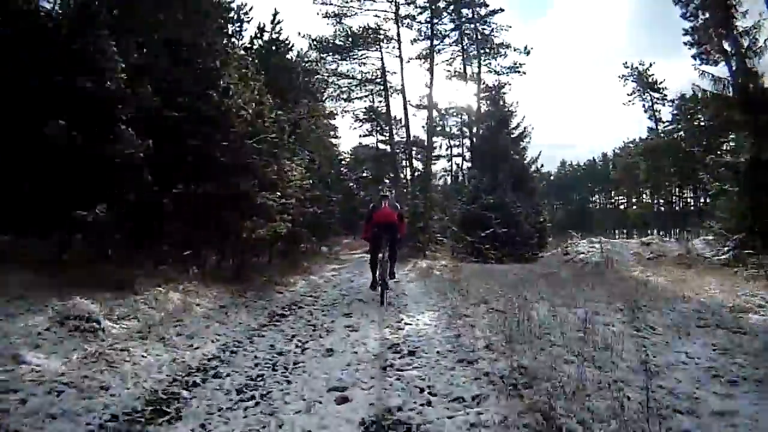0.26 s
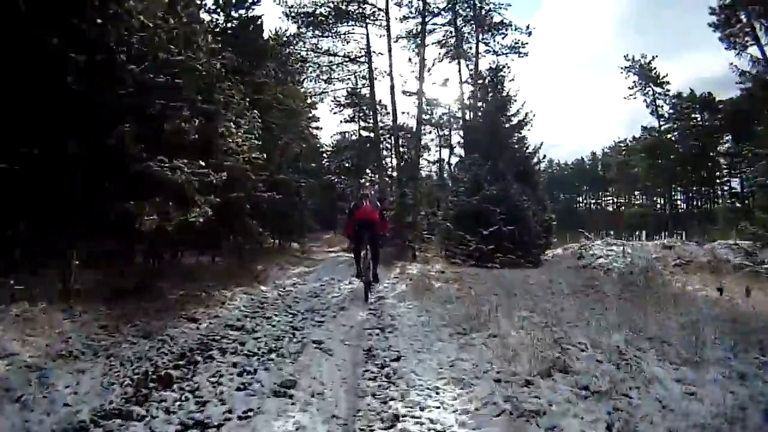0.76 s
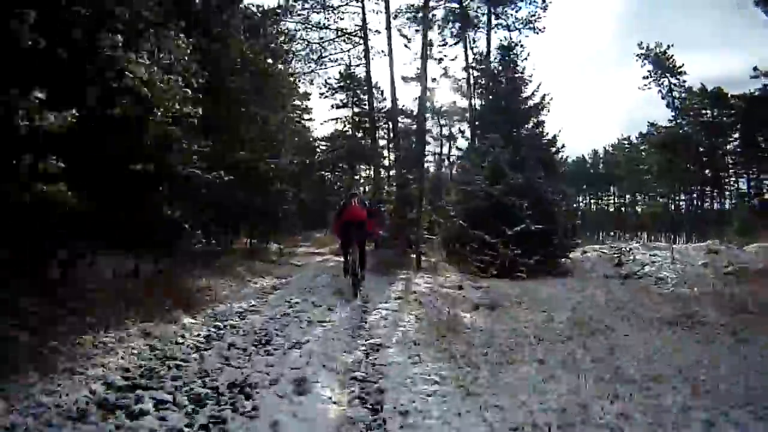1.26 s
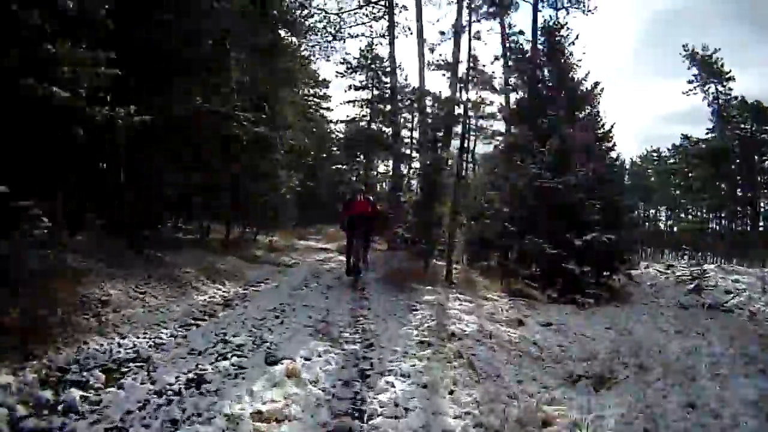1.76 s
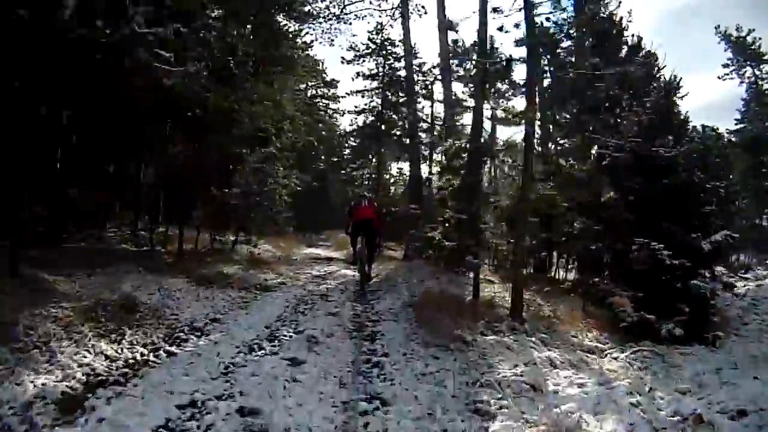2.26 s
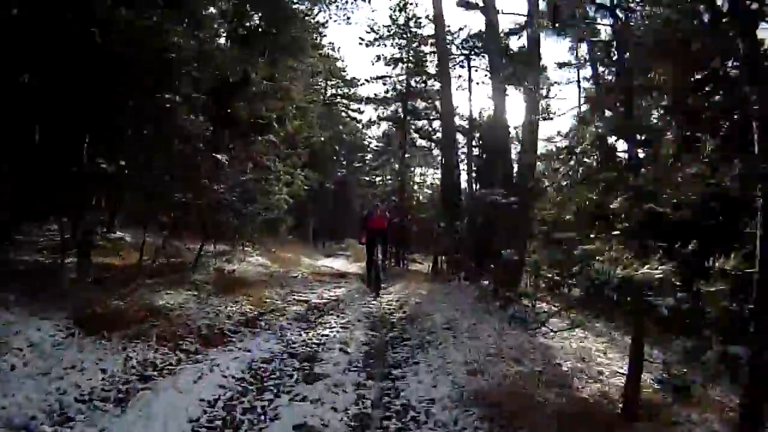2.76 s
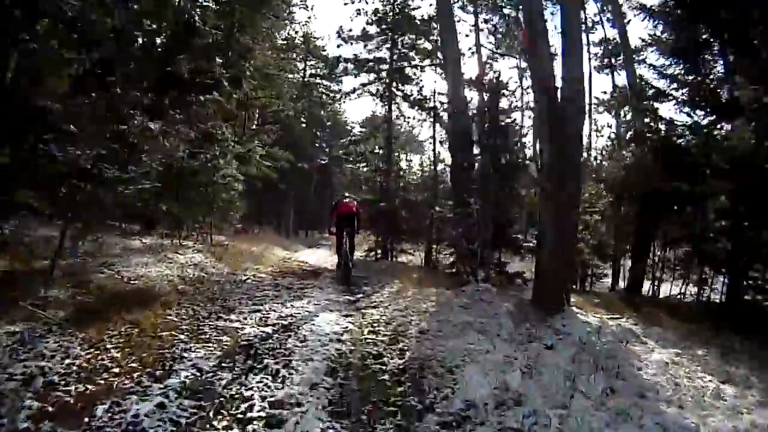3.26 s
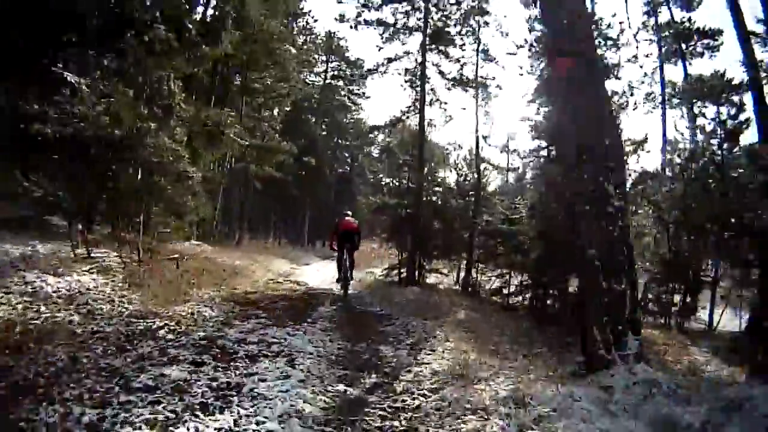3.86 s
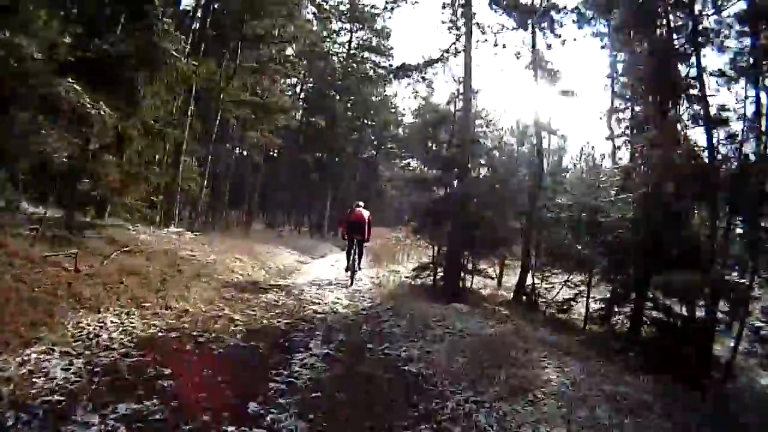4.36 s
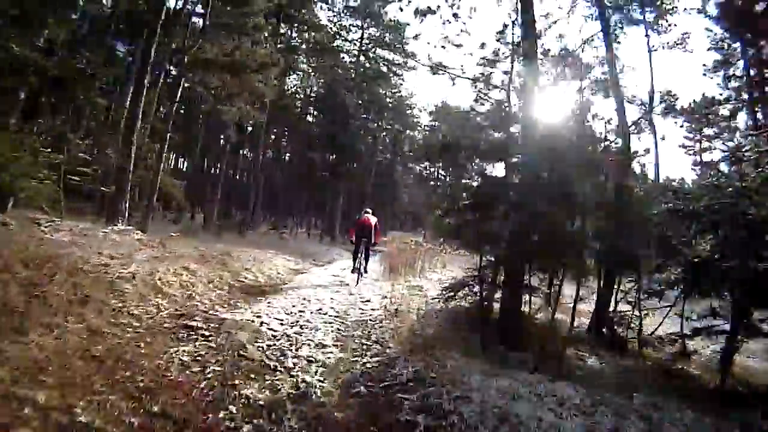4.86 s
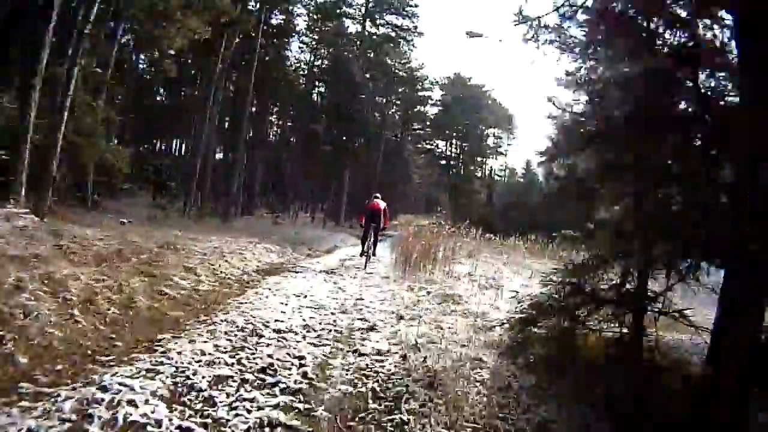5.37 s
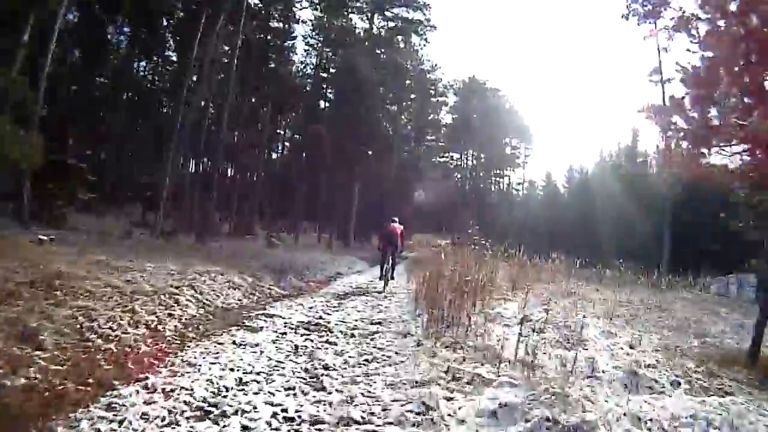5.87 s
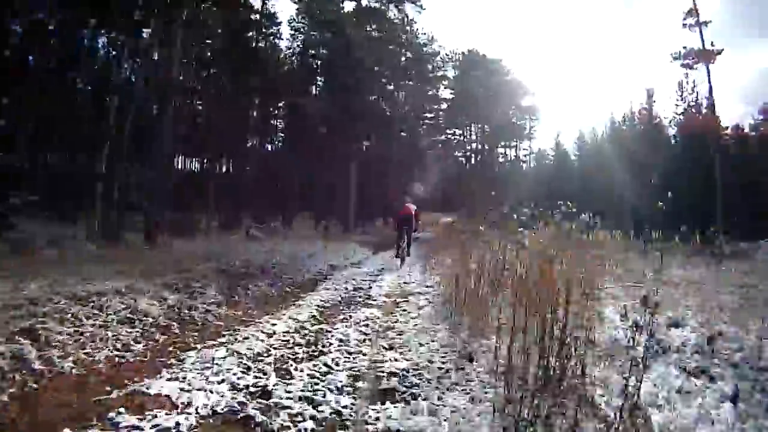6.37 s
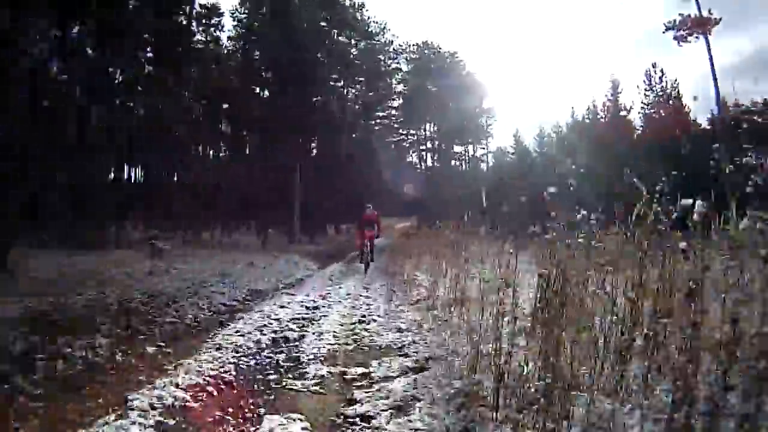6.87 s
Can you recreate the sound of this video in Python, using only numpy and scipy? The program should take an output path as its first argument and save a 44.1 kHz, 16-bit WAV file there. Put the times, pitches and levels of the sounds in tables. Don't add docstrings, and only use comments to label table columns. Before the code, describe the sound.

Bicycle tyres roll over hard ruts dusted with snow outdoors. Deep wobbling mount vibration and dull frame thuds sit beneath dry plastic clicks, flung ice chips, brief scrapes and very faint metallic rings. The ride starts fairly calm, takes a hard slap just before four seconds, and becomes rough and busy after four and a half. The microphone is inside the rattling housing; coarse, gritty treble and overloaded peaks.

```python
import sys
import numpy as np
from scipy import signal
from scipy.io import wavfile
from scipy.ndimage import uniform_filter1d

SR = 44100
rng = np.random.default_rng(int(sys.argv[2]) if len(sys.argv) > 2 else 0)


def to_wav(s):
    ch = np.atleast_2d(s).T
    pcm = np.round(np.clip(ch, -1, 1) * 32767)
    wavfile.write(sys.argv[1], SR, pcm.astype(np.int16))


def ratio_of_db(decibels):
    return 10 ** (np.asarray(decibels, float) / 20)


N = 313551

# (time [s], lumpiness level [dB], snow level [dB])
GROUND = [(0.0, -36, -51), (0.25, -41.5, -46.5), (0.55, -34.5, -48.5), (0.93, -39, -45), (1.4, -35, -44),
          (1.84, -34.5, -48), (2.2, -36, -46.5), (2.79, -37, -47.5), (3.2, -35, -45.5), (3.45, -34, -47.5),
          (4.2, -37.5, -50.5), (4.8, -29, -45.5), (5.15, -34.5, -53.5), (5.5, -33.5, -52.5),
          (5.85, -34.5, -51), (6.2, -29.5, -44.5), (6.6, -36.5, -48), (7.11, -30.5, -46.5)]
# (middle time [s], length [s], jolt gain [dB], crunch gain [dB])
PATCHES = [(0.92, 0.38, 5.5, -11.5), (1.54, 0.098, 8, 3), (1.7, 0.036, 3.5, 14), (2.345, 0.053, 9, 10),
           (3.044, 0.29, -1, 5), (3.564, 0.047, 11.5, 9), (3.645, 0.18, 17, 15), (3.785, 0.07, -4.5, 10.5),
           (3.964, 0.21, 12, -1), (4.085, 0.12, 3, 11), (4.426, 0.037, 9.5, -9), (4.512, 0.1, -7, 7.5),
           (4.642, 0.083, 14.5, 4), (1.36, .07, 2, -9), (1.303, 0.042, -5.5, -24), (3.41, 0.13, 0, 6),
           (0.972, 0.068, 3, 5), (1.15, 0.45, 1, -1), (4.787, 0.33, -5.5, 8), (4.858, 0.086, 2.5, -22),
           (4.957, 0.11, -10, 2), (5.047, 0.11, 11.5, 22), (5.124, 0.22, -0.5, 13.5),
           (5.246, 0.084, 8.5, 18.5), (5.349, 0.11, 4.5, 17), (5.496, 0.42, 1, 10),
           (5.633, 0.056, 15.5, 19.5), (5.736, 0.29, 0.5, 11.5), (5.911, 0.082, 9.5, 20),
           (5.975, 0.094, 12, 12), (6.097, 0.17, -2.5, 5), (6.29, 0.26, -1.5, 7), (6.728, 0.072, 12, -9),
           (6.912, 0.2, 5.5, 0)]
# (middle time [s], peak level [dB], length [s])
SWAYS = [(.04, -41, 0.44), (0.293, -35, 0.46), (0.51, -27.5, 0.14), (0.817, -34, 0.18), (1.156, -44, 0.68),
         (1.538, -35, 0.22), (1.88, -29.5, 0.49), (2.25, -26.5, 0.16), (2.57, -33.5, 0.95),
         (2.93, -27, 0.14), (3.163, -34, 1), (3.476, -33, 0.22), (3.683, -29, .2), (3.808, -34, 0.053),
         (4.057, -28, 0.46), (4.301, -26.5, 0.26), (4.436, -22, 0.093), (4.65, -27.5, 0.48),
         (4.927, -18.5, 0.21), (5.108, -23.5, 0.45), (5.39, -29, 0.51), (5.754, -21.5, 0.26),
         (6.073, -25.5, 0.29), (6.38, -26, 0.53), (6.628, -27.5, 0.14), (6.779, -20.5, 0.3),
         (7.036, -20, 0.23)]
# (frequency [Hz], width [Hz], level [dB])
FRAME_MODES = [(22.5, 10.9, 0.5), (99.2, 29.1, 0.5), (144.4, 32, -2.5), (212.5, 59, 2), (250, 64.7, 2),
               (340.7, 73.3, -5), (501.2, 47, -7), (815, 103, -25.5), (1220, 160, -42)]
# (frequency [Hz], level [dB per Hz])
GRIT_SPECTRUM = [(320, -31), (550, -23), (658, -37), (763, -1), (950, -3.5), (1710, -9.5), (2460, -2),
                 (3250, -23.5), (3740, -18), (4380, -48), (5900, -36), (7670, -65), (13000, -120)]
# (frequency [Hz], width [Hz], level [dB])
HOUSING_MODES = [(1573, 370, -17.5), (2197, 431, 1.5), (2370, 810, -2), (2988, 343, -4.5), (3536, 480, -12),
                 (3830, 370, -9), (4500, 580, -18), (5950, 10000, -27.5)]
# (frequency [Hz], width [Hz], level [dB])
PLATE_MODES = [(616, 620, 7), (950, 376, 10), (1357, 200, 2), (1900, 230, -1.5)]
# (frequency [Hz], level at a full tick [dB], decay by 60 dB [s])
METAL_RINGS = [(2900, -41, .16), (3800, -50, .1)]
# (time [s], peak level [dB])
TAPS = [(0.0258, -21.5), (1.145, -25), (1.566, -18.5), (1.83, -32), (1.869, -17), (1.97, -22.5),
        (2.3164, -29), (3.1728, -27), (3.47, -26), (3.7513, -19), (3.8007, -27.5), (3.839, -25),
        (4.3846, -19.5), (4.432, -23), (4.6676, -18), (4.7154, -20), (4.821, -25), (4.973, -25.5),
        (5.1188, -21), (5.221, -24), (5.58, -27.5), (5.6303, -28), (5.937, -30), (6.018, -24),
        (6.0567, -25.5), (6.1816, -23.5), (6.2632, -24), (6.313, -11.5), (6.9032, -29.5), (7.042, -22.5)]
# (time [s], peak level [dB])
CORNERS = [(0.028, -34), (0.5317, -28), (0.7755, -43), (1.5658, -27), (1.8687, -33), (1.946, -29),
           (2.0233, -29), (2.336, -20.5), (2.469, -31), (2.9572, -21), (3.238, -23), (3.6711, -17),
           (3.6965, -13), (3.8393, -36), (3.9434, -23), (3.983, -24), (4.3844, -48), (4.4508, -25),
           (4.7658, -27), (4.9006, -25), (5.0502, -16), (5.1193, -27), (5.1822, -19), (5.464, -24),
           (5.655, -18), (5.703, -21), (5.7445, -34), (5.9075, -33), (5.9584, -18), (6.2102, -24),
           (6.2971, -13.5), (6.351, -16), (6.5294, -33), (6.8427, -16.5)]
# (time [s], peak level
# [dB], loudest frequency [Hz])
CHIPS = [(1.182, -37.5, 2390), (1.691, -27, 1690), (1.693, -42, 2240), (1.847, -31, 2090),
         (1.9882, -29, 2390), (2.004, -29, 2300), (2.344, -35, 2840), (2.364, -26.5, 1760),
         (3.25, -29, 2770), (3.254, -26, 2900), (3.558, -34, 2120), (3.642, -12, 3030), (3.651, -19, 2340),
         (3.993, -28, 2880), (4.7366, -29, 2270), (4.756, -33, 2120), (5.012, -28, 1810),
         (5.0417, -21, 2670), (5.1994, -34, 2170), (5.2287, -32, 2590), (5.236, -21, 2470),
         (5.347, -36, 2270), (5.7033, -21.5, 2400), (5.726, -29, 2420), (5.7432, -21, 3920),
         (6.2218, -26, 2420), (6.252, -33, 2210), (6.3045, -38, 2410), (6.3375, -27, 2810),
         (6.363, -26, 2210), (6.51, -28, 2350), (6.716, -33, 2740), (6.8283, -33, 2050),
         (3.6978, 2.5, 3200), (3.631, -14, 2950), (3.6575, -24, 2920), (3.681, -26, 2880),
         (3.689, -20, 3580), (5.6767, -26, 2300), (5.626, -36, 3500), (5.696, -32, 2300), (3.7, -3, 1945),
         (.495, -47, 3000), (2.549, -42, 2600), (4.582, -46, 3700), (4.69, -33, 3800), (4.71, -32, 3730),
         (5.08, -30, 3800), (5.13, -36, 2780), (5.271, -34, 3970), (5.805, -29, 2370), (3.6981, -7, 1210),
         (4.646, -11, 1460), (4.6475, -12, 2130), (3.6946, -9, 3000), (3.655, -24, 1000),
         (4.631, -18.5, 2010), (5.581, -29.5, 2290), (5.875, -35, 4500), (5.931, -33, 4800),
         (5.49, -39, 4200)]
# (time [s], peak level [dB], loudest frequency [Hz], contact length [ms])
TICKS = [(0.5319, -19, 2670, 2.8), (0.776, -24.5, 3550, 4.5), (2.0234, -15.5, 2760, 3.3),
         (2.3358, -12, 2660, 2.1), (2.4711, -13.5, 2370, 2.7), (2.957, -17.5, 2500, 3.6),
         (3.2348, -3.5, 2550, 1.8), (3.239, -3.5, 2820, 1.9), (3.4902, -18.5, 2500, 2.2),
         (3.63, -30, 2960, 4.9), (3.7342, -16.5, 2190, 4.7), (3.983, -12.5, 2500, 3.3),
         (4.451, -13.5, 2500, 2.9), (4.7654, -10.5, 2280, 2.1), (4.8997, -16, 2690, 3),
         (5.0505, -7.5, 2760, 2.3), (5.07, -10.5, 2250, 1.1), (5.182, -12, 2310, 3.6),
         (5.2469, -9.5, 2280, 6.3), (5.464, -11, 2360, 2.1), (5.656, -8.5, 2380, 2.7),
         (5.7492, -10.5, 2430, 3.1), (5.908, -14.5, 2530, 3.6), (5.9582, -5, 2450, 2.6),
         (6.2095, -12, 2500, 3), (6.297, -8.5, 2240, 1.9), (6.352, -5.5, 2540, 1.5),
         (6.3706, -13.5, 2120, 3.3), (6.528, -12, 2360, 3.9), (6.842, -9.5, 2540, 3.3)]
# (time [s], peak level [dB])
RATTLES = [(1.514, -35), (2.758, -35), (3.5857, -27), (3.7793, -30), (3.816, -31), (3.908, -30),
           (4.0142, -26), (4.0694, -51), (4.4153, -29), (5.5233, -29), (5.669, -19), (5.712, -22),
           (5.768, -25), (5.7828, -24), (5.8202, -25.5), (5.8735, -37), (5.973, -24), (5.996, -24),
           (6.0346, -32), (6.2374, -24), (6.4094, -47), (6.504, -32), (6.5382, -19.5), (6.5874, -32.5),
           (6.6824, -29), (6.788, -34), (6.8568, -15), (6.9032, -35), (6.911, -26.5), (7, -42)]
# (time [s], peak level [dB], loudest frequency [Hz], contact length [ms])
SLAPS = [(1.7922, -23, 2640, 1.5), (1.944, -26, 2480, 7.9), (2.115, -29.5, 1820, 4),
         (2.6986, -33.5, 2300, 5.2), (2.902, -30.5, 2120, 3), (3.544, -35, 2090, 3.4),
         (3.5932, -25, 2200, 4.1), (3.622, -17.5, 2120, 4.5), (3.6706, -16.5, 2800, 2.2),
         (3.697, 3.5, 2030, 1.3), (3.9223, -30.5, 2320, 2.7), (3.942, -15.5, 2100, 5.2),
         (3.965, -33, 2220, 1.2), (4.5476, -24, 2250, 0.3), (4.629, -16, 1700, 3.7),
         (4.6451, -4.5, 1880, 1.4), (4.8405, -32.5, 2200, 3.9), (5.292, -26.5, 2150, 4.6),
         (5.35, -23.5, 2260, 1.5), (5.4197, -23.5, 1910, 0.76), (5.4242, -35, 3780, 8.3),
         (5.6166, -29, 3000, 10), (5.7027, -23, 4500, 1), (5.805, -35, 2100, 5.7)]
# (time [s], peak level [dB], loudest frequency [Hz])
BUMPS = [(0.266, -30, 231), (0.299, -17, 263), (0.594, -15.5, 216), (1.607, -20, 223), (1.752, -17, 223),
         (1.851, -17, 170), (2.917, -13, 238), (3.572, -16, 230), (3.601, -14, 272), (3.924, -11, 160),
         (4.58, -8.5, 149), (4.7, -9.5, 250), (4.852, -10, 230), (4.925, -15, 150), (5.067, -1.5, 197),
         (5.225, -8, 206), (5.606, -9, 151), (5.617, -23, 270), (5.655, -13.5, 420), (5.982, -3.5, 205),
         (6.202, -12, 201), (6.297, -11, 269), (6.351, -13, 287), (6.676, -12.5, 202), (6.688, -13, 205),
         (6.732, -9.5, 171), (6.978, -20, 179), (7.061, -25, 150), (3.687, -12, 110), (4.617, -6.5, 110)]
# (time [s], peak level [dB], loudest frequency [Hz], upper ring re thud [dB])
RUTS = [(0.897, -10, 300, -31), (1.049, -16, 271, -17.5), (2.424, -8, 248, -38), (2.568, -11.5, 217, -21),
        (3.236, -19, 386, -4), (3.557, -13, 260, -5.5), (3.632, -14, 267, -5), (3.694, -3.5, 412, -13),
        (3.904, -12, 222, -32), (4.548, -1, 292, -14.5), (4.631, -3, 198, -9), (4.6445, 0, 300, -7),
        (5.005, -6, 260, -36), (5.04, -8, 206, -14), (5.293, -11.5, 250, -5.5), (5.351, -2, 287, -10),
        (5.629, -2, 307, -12.5), (5.695, -10, 227, -18), (5.72, -5.5, 250, -14), (5.748, -10, 215, -12),
        (5.918, -8, 230, -23), (5.963, -5, 220, -26), (6.157, -10, 258, -32), (6.228, -9, 220, -10),
        (6.34, -10, 262, -11.5), (6.366, -6, 218, -12), (6.531, -12, 222, -13.5), (6.715, -5.5, 205, -33),
        (6.918, -4.5, 150, -17), (7.041, -3.5, 253, -13)]
# (start time [s], rms level [dB], length [ms])
GRINDS = [(.65, -55, 32), (3.598, -44, 20), (3.618, -35, 19), (3.64, -36, 26), (3.672, -35, 11),
          (4.61, -44, 20), (4.652, -39, 30), (4.98, -50, 44), (5.035, -45, 62), (5.183, -41.5, 25.5),
          (5.246, -39, 10), (5.615, -41, 37), (5.657, -40.5, 24), (5.96, -37, 31), (6.295, -39, 27),
          (6.35, -38, 44), (.86, -58, 92), (1.36, -61, 90), (5.33, -55, 40), (5.42, -49, 60),
          (5.69, -47, 65), (5.865, -47, 72), (6.18, -50, 100), (6.5, -52, 63), (6.83, -49, 45),
          (3.55, -51, 25)]
# (time [s], peak level [dB], frequency [Hz])
PINGS = [
    (0.78, -48, 2870),
    (1.147, -48, 2880),
    (1.567, -56, 2880),
    (2.474, -40.5, 2910),
    (3.702, -41, 3810),
    (3.703, -36, 2870),
    (4.652, -38, 2780),
]
# (start time [s], rms level [dB], length [ms])
SCUFFS = [(4.048, -48, 19), (4.215, -53, 21), (4.628, -38, 34), (5.038, -42, 12), (5.225, -56, 25),
          (5.335, -56, 18), (5.418, -35.5, 17), (5.455, -33.5, 4), (5.61, -40, 10), (5.699, -39.5, 25),
          (5.872, -40, 12), (5.937, -37, 6.1), (6.255, -33, 14), (6.385, -46, 27), (6.856, -55, 8.8)]
# (frequency [Hz], level re sound [dB], share of time [0-1])
CHANNEL_ERROR = [(60, -40, 0.083), (300, -40, 0.104), (1000, -18.5, 0.11), (3000, -31, 0.12),
                 (4500, -12, 0.3), (6600, -3.5, 0.98), (9900, -19.5, 0.4), (16000, -1, 0.22)]

MOUNT_HZ, MOUNT_WIDTH_HZ, MOUNT_REST_DB = 48.7, 11.9, -34
CRACKLE_DB, CRACKLE_FOLLOWS_LUMPS = -70.5, 0.77
GRIT_FOLLOWS_CRUNCH, GRIT_FOLLOWS_JOLT = 0.27, 0.69
HISS_DB = -69
# (level reaching the clamp plate [dB], lean to one resonance, metal part damped)
TICK, TAP, SLAP = (-23, 0.73, False), (-22, 0.37, False), (-8, 1.36, True)
RATTLE, CHIP, CORNER = (-35, 0.1, False), (-23, 2.8, True), (-40, 11, True)
TAP_HZ, TAP_MS = 2550, 3.4
RATTLE_HZ, RATTLE_MS = 3120, 2.6
CHIP_MS = 1.37
CORNER_HZ, CORNER_MS, CORNER_LOSS_DB = 3904, 0.93, 3.5
SNAP = 4.54
BUMP_UPPER_DB = -15
PING_T60_S = 0.17
TOP_OPENS_DB = 18
UP, DOWN, HOLD = 147, 40, 4


def rms_one(x):
    return x / np.sqrt(np.mean(x ** 2) + 1e-20)


def band_pass(x, order, low_hz, high_hz):
    return signal.sosfilt(signal.butter(order, [low_hz, high_hz], "band", fs=SR, output="sos"), x)


def in_time(rows):
    s, *columns = np.transpose(rows)
    return [np.interp(np.arange(N) / SR, s, c) for c in columns]


def swells(middle_s, length_s, height):
    t = np.arange(0, N, 40) / SR
    away = np.clip((t[:, None] - middle_s) / np.maximum(length_s, 0.02), -0.5, 0.5)
    humps = np.cos(np.pi * away) ** 2
    return np.interp(np.arange(N) / SR, t, humps @ height)


def drift(rate):
    r = np.exp(-80 * np.pi * rate / SR)
    noise = rng.standard_normal(N // 40 + 2002)
    slow = signal.lfilter([1], [1, -2 * r, r * r], noise)[2000:]
    return np.interp(np.arange(N) / 40, np.arange(len(slow)), rms_one(slow))


def resonance(x, hz, width_hz):
    r = np.exp(-np.pi * width_hz / SR)
    poles = [1, -2 * r * np.cos(2 * np.pi * hz / SR), r * r]
    return signal.lfilter([(1 - r * r) / 2, 0, (r * r - 1) / 2], poles, x)


def body(x, modes):
    return sum((-1) ** k * ratio_of_db(db) * resonance(x, hz, width) for k, (hz, width, db) in enumerate(modes))


def grains(per_s, spread_db):
    sizes = ratio_of_db(spread_db * np.minimum(rng.exponential(1, N), 4.2)) * rng.choice([-1, 1], N)
    return rms_one(sizes * (rng.random(N) < per_s / SR))


def add(out, s, sound, peak_db):
    i = max(round(s * SR), 0)
    out[i:i + len(sound)] += (ratio_of_db(peak_db) * sound / np.max(np.abs(sound)))[:N - i]


def bursts(events, soft_samples):
    t = np.arange(N) / SR
    gate = sum(ratio_of_db(db) * ((t > s) & (t < s + ms / 1000)) for s, db, ms in events)
    return uniform_filter1d(gate, size=soft_samples)


def mount(sway_db):
    shake = rng.standard_normal(N)
    narrow = resonance(shake, MOUNT_HZ, MOUNT_WIDTH_HZ)
    sway = rms_one(resonance(narrow, MOUNT_HZ, 102))
    evened = sway / (1.25 + np.sqrt(uniform_filter1d(sway ** 2, size=2500)))
    return ratio_of_db(sway_db) * rms_one(evened)


def frame(rumble_db):
    jolts = grains(per_s=400, spread_db=5.0) + 1.3 * rng.standard_normal(N)
    together = drift(rate=2.9)
    shaken = 0
    for k, (hz, width, db) in enumerate(FRAME_MODES):
        share_db = db + 1.4 * together + 1.36 * drift(rate=9.6)
        shaken = shaken + (-1) ** k * ratio_of_db(share_db) * resonance(jolts, hz, width)
    return ratio_of_db(rumble_db + 3.0) * rms_one(shaken)


def grit(grit_db):
    clumps = ratio_of_db(1.7 * drift(rate=30))
    crumbs = [clumps * (rng.standard_normal(N) + 0.75 * grains(per_s=840, spread_db=6.5))
              for _ in range(2)]
    edges = 550 * 2 ** (np.arange(12) / 3.2)
    hz, db = np.transpose(GRIT_SPECTRUM)
    out = 0
    for k, (low, high) in enumerate(zip(edges, edges[1:])):
        band = band_pass(crumbs[k % 2], 2, low, high)
        level_db = np.interp(np.log(low * high) / 2, np.log(hz), db)
        out = out + ratio_of_db(level_db + 2 * drift(rate=50.0)) * band
    out = out + 0.73 * resonance(out, 1370, 180)
    return ratio_of_db(grit_db - 1.6) * rms_one(out)


def crackle(crackle_db, crunch_db):
    runs = ratio_of_db(4.0 * drift(rate=83))
    thick = np.clip(0.3 + crunch_db / 10, 0.1, 2.2)
    clicks = grains(per_s=2400, spread_db=6.5) + 0.4 * rng.standard_normal(N)
    crumbs = thick * runs * clicks + 0.4 * rng.standard_normal(N)
    bright = band_pass(crumbs, 2, 2800, 5700)
    return ratio_of_db(crackle_db + 0.5) * rms_one(bright + 2.2 * body(crumbs, HOUSING_MODES))


def hiss():
    faint = band_pass(rng.standard_normal(N), 1, 1500, 8000)
    return ratio_of_db(HISS_DB + 2.1 * drift(rate=1.6)) * rms_one(faint)


def contacts():
    hard = [(*row, *TICK) for row in TICKS]
    slaps = [(*row, *SLAP) for row in SLAPS]
    taps = [(s, db, TAP_HZ, TAP_MS, *TAP) for s, db in TAPS]
    rattles = [(s, db, RATTLE_HZ, RATTLE_MS, *RATTLE) for s, db in RATTLES]
    chips = [(s, db, hz, CHIP_MS, *CHIP) for s, db, hz in CHIPS]
    corners = [(s, db - CORNER_LOSS_DB, CORNER_HZ, CORNER_MS, *CORNER) for s, db in CORNERS]
    return hard + slaps + taps + rattles + chips + corners


def ticks():
    out, t = np.zeros(N), np.arange(6000) / SR
    events = contacts()
    chance = rng.standard_normal((len(events), 1000))
    for (s, peak_db, hz, ms, plate_db, lean, damped), noise in zip(events, chance):
        contact = np.zeros(len(t))
        fade = t[:1000] / (max(ms, 0.3) * 0.002)
        contact[:1000] = noise * fade ** 0.64 * np.exp(-2.5 * fade)
        contact[6] += SNAP * (not damped)
        leaning = lean * resonance(resonance(contact, hz, 404), hz, 850)
        add(out, s, body(contact, HOUSING_MODES) + leaning, peak_db - 0.6)
        add(out, s, body(contact, PLATE_MODES), peak_db + plate_db + 5.0)
        for ring_hz, ring_db, t60 in METAL_RINGS:
            bent_hz = ring_hz * (1 + 0.008 * noise[1])
            ring = np.sin(2 * np.pi * bent_hz * t) * ratio_of_db(-60 * t / t60)
            add(out, s, ring, peak_db / 2 + ring_db - 7 * damped + 3 * noise[0])
    return out


def thuds():
    out, t = np.zeros(N), np.arange(3000) / SR
    push = np.sin(np.pi * np.minimum(t / 0.0022, 1)) ** 2 + 1e-18
    upper = resonance(resonance(push, 481.0, 78), 435, 92)
    for s, peak_db, hz, upper_db in RUTS + [(*row, BUMP_UPPER_DB) for row in BUMPS]:
        pushed = 0.12 * body(push, FRAME_MODES[3:6]) + resonance(push, hz, 59.6)
        add(out, s, resonance(pushed, hz, 257), peak_db - 7.5)
        add(out, s, upper, peak_db + upper_db + 0.5)
    return out


def grinds():
    rub = ratio_of_db(4.0 * drift(rate=150)) * rng.standard_normal(N)
    rung = body(rub, HOUSING_MODES) + 1.03 * resonance(rub, 2850, 210)
    return rms_one(rung) * bursts(GRINDS, soft_samples=180)


def pings():
    out, t = np.zeros(N), np.arange(6000) / SR
    for s, peak_db, hz in PINGS:
        add(out, s, np.sin(2 * np.pi * hz * t) * ratio_of_db(-60 * t / PING_T60_S), peak_db)
    return out


def scuffs():
    brush = rms_one(band_pass(rng.standard_normal(N), 1, 1900, 7000))
    return brush * bursts(SCUFFS, soft_samples=130)


def scene():
    lump_db, snow_db = in_time(GROUND)
    middle_s, length_s, jolt_db, crunch_db = np.transpose(PATCHES)
    jolt_db = swells(middle_s, length_s, jolt_db)
    crunch_db = swells(middle_s, length_s, crunch_db)
    middle_s, peak_db, length_s = np.transpose(SWAYS)
    sway_db = 20 * np.log10(ratio_of_db(MOUNT_REST_DB) + swells(middle_s, length_s, ratio_of_db(peak_db)))
    grit_db = snow_db + GRIT_FOLLOWS_CRUNCH * crunch_db + GRIT_FOLLOWS_JOLT * jolt_db
    crackle_db = CRACKLE_DB + crunch_db + CRACKLE_FOLLOWS_LUMPS * (lump_db - lump_db.mean())
    rolling = mount(sway_db) + frame(lump_db + jolt_db) + grit(grit_db)
    thrown = crackle(crackle_db, crunch_db) + hiss()
    struck = ticks() + thuds() + grinds() + pings() + scuffs()
    mono = rolling + thrown + struck
    return np.array([mono, mono])


def sample_and_hold(x):
    slow = signal.resample_poly(x, DOWN, UP)
    held = signal.resample_poly(np.repeat(slow, HOLD), UP, DOWN * HOLD)[:N]
    return np.pad(held, (0, N - len(held)))


def top_cut(x):
    low = signal.sosfiltfilt(signal.cheby2(16, 40, 15900, fs=SR, output="sos"), x)
    treble = signal.sosfilt(signal.butter(2, 6000, "high", fs=SR, output="sos"), x)
    fast = uniform_filter1d(treble ** 2, size=256)
    slow = uniform_filter1d(treble ** 2, size=2048)
    sharp = (fast > 2.5 * slow) & (fast > ratio_of_db(TOP_OPENS_DB) * np.median(fast))
    near_sharp = uniform_filter1d(1.0 * sharp, size=400) > 0
    opening = uniform_filter1d(1.0 * near_sharp, size=128)
    return low + ratio_of_db(-15.0) * opening * (x - low)


def smear(x):
    hz, _, frames = signal.stft(x, SR, nperseg=512)
    at, db, share = np.transpose(CHANNEL_ERROR)
    db, share = [np.interp(np.log(hz + 1), np.log(at), c)[:, None] for c in (db, share)]
    dice = rng.random((len(hz) // 12 + 1, frames.shape[1] // 4 + 1))
    dice = np.repeat(np.repeat(dice, 12, axis=0), 4, axis=1)[:len(hz), :frames.shape[1]]
    treble = np.log(np.mean(np.abs(frames[40:180]) ** 2, axis=0) + 1e-20)
    loudness = np.clip(0.7 + 0.35 * (treble - np.median(treble)), 0.2, 2.2)
    apart = dice < share * loudness
    turned = np.exp(2j * np.pi * rng.random(frames.shape))
    return signal.istft(frames * ratio_of_db(db) * apart * turned, SR, nperseg=512)[1][:N]


def band_limit(x):
    return signal.sosfilt(signal.butter(12, 16600, fs=SR, output="sos"), x)


def record(dry):
    overloaded = 1.099 * np.tanh(dry[0] / 1.108)
    held = sample_and_hold(overloaded)
    cut = signal.sosfilt(signal.cheby2(18, 50, 16700, fs=SR, output="sos"), top_cut(held))
    cut = cut - 0.25 * resonance(cut, 13540, 3800)
    side = smear(cut)
    return band_limit(np.array([cut + side, cut - side]))


dry = scene()
out = record(dry)
to_wav(out)
```